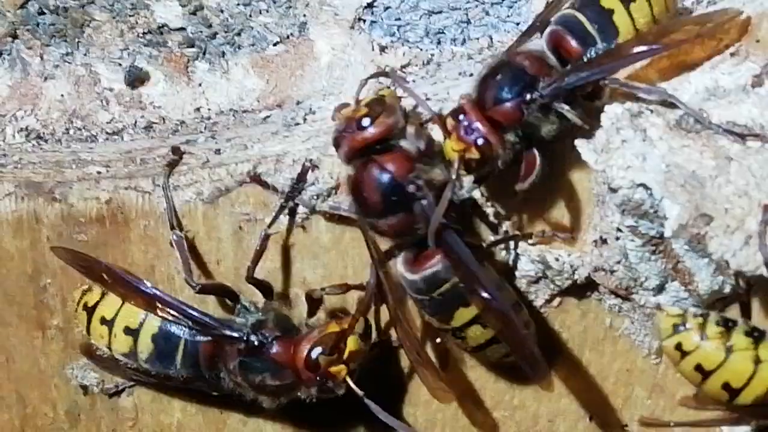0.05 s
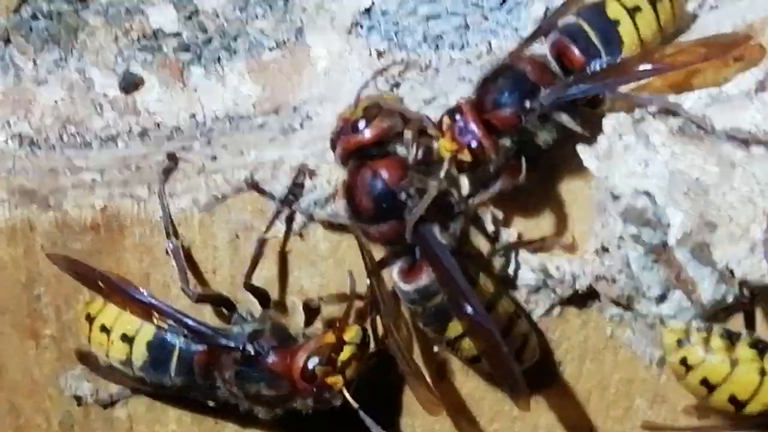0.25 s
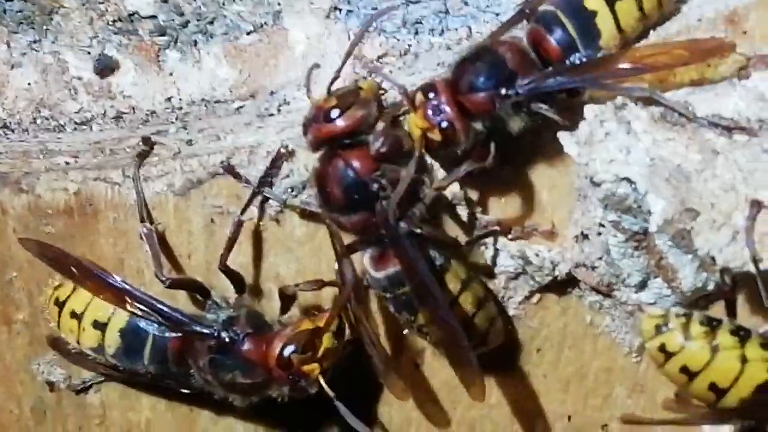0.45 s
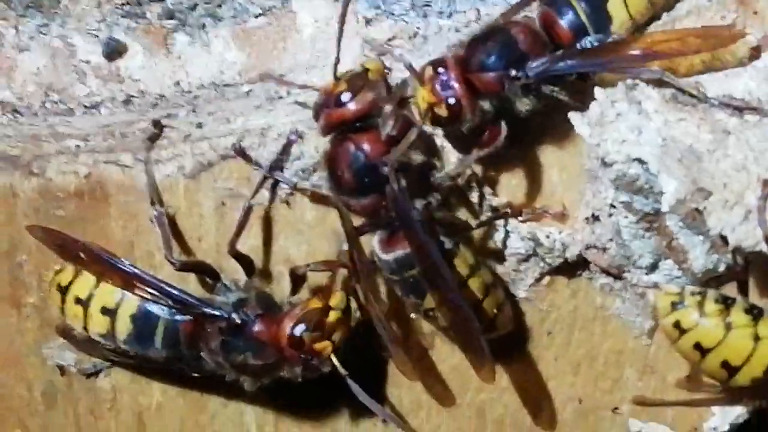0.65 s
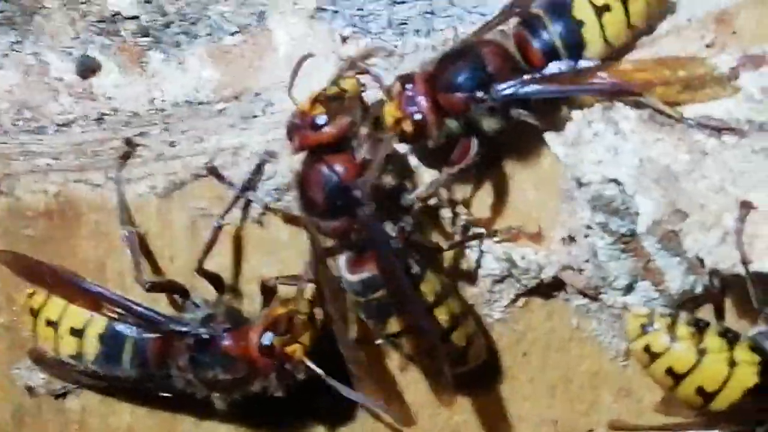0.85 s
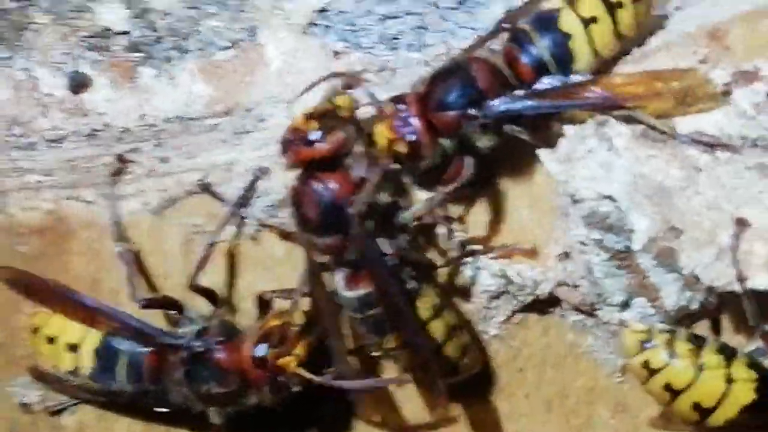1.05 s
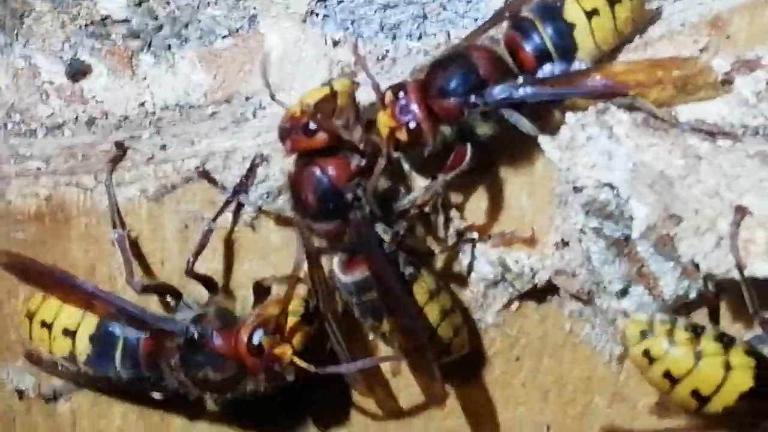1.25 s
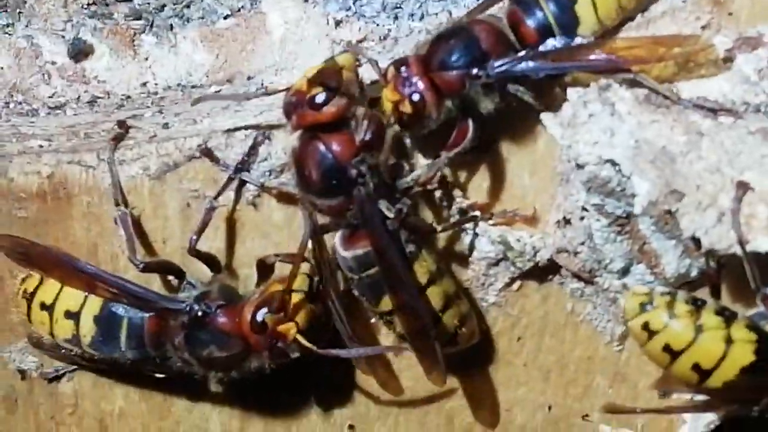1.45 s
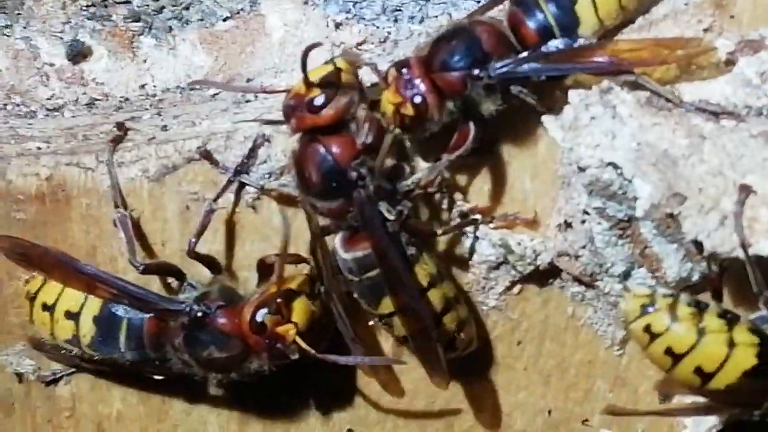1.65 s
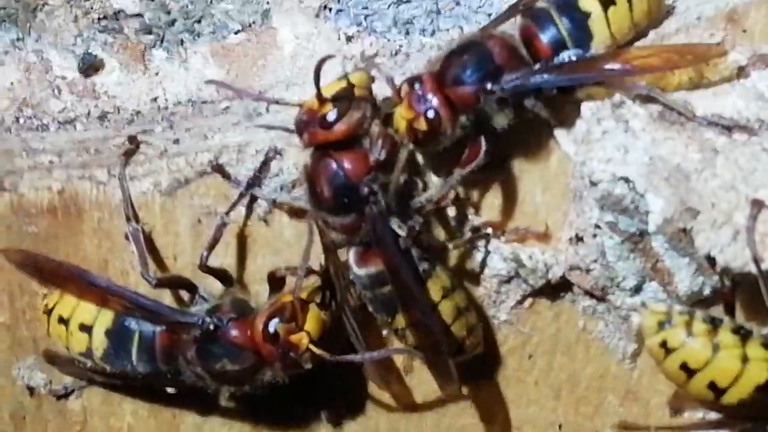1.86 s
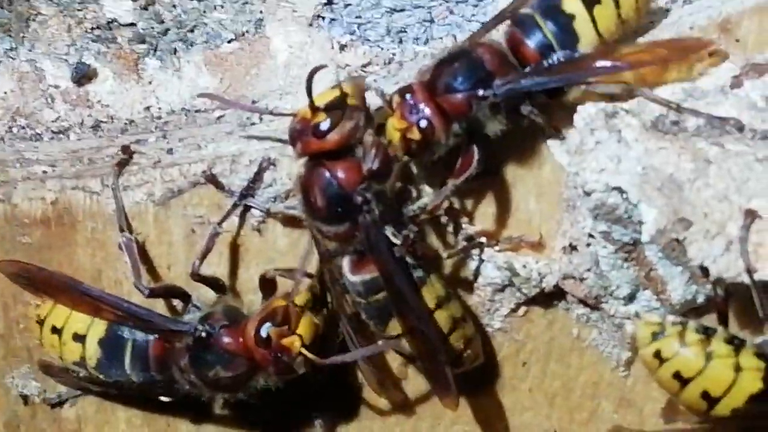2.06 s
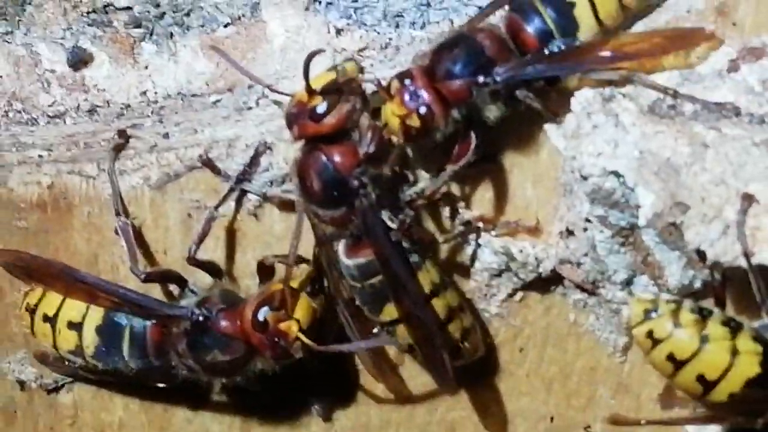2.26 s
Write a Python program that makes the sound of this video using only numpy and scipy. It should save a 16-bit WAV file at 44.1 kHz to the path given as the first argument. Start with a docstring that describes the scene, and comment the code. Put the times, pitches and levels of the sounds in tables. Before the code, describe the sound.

Two tiny dry hornet clicks over faint steady hiss in a quiet attic.

```python
"""A quiet attic, close to hornets crawling on a beam.
After 0.2 s of silence the microphone switches on with a soft pop as its bias jumps and drains.
It then hisses over house rumble, faint air and a wavering low hum, probably wings inside the nest.
At 1.3 s and 2.1 s two tiny dry ticks, likely jaws or claws, sound beside the right port;
each knocks the wood softly and scatters off beam and roof."""
import sys
import numpy as np
from scipy import signal
from scipy.fft import rfft, irfft
from scipy.io import wavfile
from scipy.ndimage import uniform_filter1d

SR = 44100
rng = np.random.default_rng(int(sys.argv[2]) if len(sys.argv) > 2 else 0)


def unload_audio(sound):
    """Save the sound as a 16-bit wav file, at the path given as the first command line argument."""
    columns = np.transpose(np.atleast_2d(sound))
    # keep every value between -1 and 1, then stretch to whole-number steps
    steps = np.round(np.clip(columns, -1, 1) * 32767)
    wavfile.write(sys.argv[1], SR, steps.astype(np.int16))


N = 105840

# background gain while the microphone settles (time [s], gain [dB])
SETTLING = [(.2, 1.5), (.28, 3), (.38, 4.5), (.47, 4), (.58, 1), (2.4, 1.5)]


def undb(db):
    return 10 ** (np.asarray(db) / 20)


def since(start_s):
    """Seconds since start_s; zero before it."""
    return np.maximum(np.arange(N) / SR - start_s, 0)


def delay(x, ms):
    """Circular delay by a linear phase shift."""
    hz = np.fft.rfftfreq(N, 1 / SR)
    return irfft(rfft(x) * np.exp(-2j * np.pi * hz * ms / 1000), N)


def gain_curve(points):
    """Linear gain along points (time [s], gain [dB])."""
    return undb(np.interp(np.arange(N) / SR, *np.array(points).T))


def noise(spectrum, rms_db):
    """Noise shaped by a spectrum (frequency [Hz], relative density [dB])."""
    hz, density_db = np.array(spectrum).T
    bins_hz = np.maximum(np.fft.rfftfreq(N, 1 / SR), 1)
    gain = undb(np.interp(np.log(bins_hz), np.log(hz), density_db))
    x = irfft(rfft(rng.standard_normal(N)) * gain, N)
    return x * undb(rms_db) / x.std()


def drift(rate_hz):
    """Smooth random drift, zero mean, unit variance."""
    hold = max(int(SR / rate_hz), 1)
    steps = np.repeat(rng.standard_normal(N // hold + 1), hold)
    x = uniform_filter1d(uniform_filter1d(steps, hold), hold)[:N]
    return (x - x.mean()) / x.std()


def ring(ms, hz, decay_ms):
    """One damped mode."""
    return np.sin(2 * np.pi * hz * ms / 1000) * np.exp(-ms / decay_ms)


def attic_air():
    """Faint air, alike at both ports."""
    # (frequency [Hz], relative density [dB])
    air_spectrum = [(400, 7), (650, -21), (850, -11.5), (1300, -1.5), (1700, 1), (2300, -9), (4000, -7.5),
                    (9000, -40)]
    return noise(air_spectrum, -85.5) * gain_curve(SETTLING)


def house_rumble():
    """Low noise of the house, strongest near 70 Hz."""
    # (frequency [Hz], relative density [dB])
    rumble_spectrum = [(20, -8.5), (40, 1.5), (72, 4), (95, 2), (130, -6.5), (170, -5), (240, -11.5),
                       (330, -15), (450, -34), (650, -37), (1200, -47.5)]
    return noise(rumble_spectrum, -71) * gain_curve(SETTLING)


def microphone_hiss(whine_hz=5321):
    """Independent hiss per port, resonant near 8 kHz, plus a thin electrical whine."""
    # (frequency [Hz], left relative density [dB], right relative density [dB])
    hiss_spectra = [(30, -1.5, 1), (244, 4.5, 3), (594, -2, -0.5), (1180, 2.5, 4.5), (2140, -1, 0),
                    (4540, 0.5, 3), (6420, -1, -0.5), (7160, -2, 4), (7900, 4, 7.5), (8940, -2, -1.5),
                    (9930, -6.5, -3.5), (10200, -5.5, -6.5), (16000, -8.5, -8.5)]
    left = noise([(hz, db) for hz, db, _ in hiss_spectra], -73)
    right = noise([(hz, db) for hz, _, db in hiss_spectra], -71)
    whine = np.sqrt(2) * undb([[-101], [-87]]) * np.sin(2 * np.pi * whine_hz * since(0))
    return np.array([left, right]) * gain_curve(SETTLING) + whine


def switch_on_pop(on_s, rise_ms=0.048, overshoot_ms=0.19, slow_lag_ms=0.56, slow_ms=0.24, drain_s=0.13):
    """The microphone's bias jumps and overshoots, takes a second, slower step, then drains away."""
    t = since(on_s)
    ms = 1000 * t
    fast = (1 - np.exp(-(ms / rise_ms) ** 2)) * (1 + np.exp(-ms / overshoot_ms))
    slow = 1 - np.exp(-np.maximum(ms - slow_lag_ms, 0) / slow_ms)
    drain = np.exp(-(t / drain_s) ** 1.32)
    fast_share = np.array([[0.8], [0.31]])  # left, right
    return -undb(-28) * (fast_share * fast + (1 - fast_share) * slow) * drain


def hum_tone(hz, level_db, waver_db, wander_hz):
    """A sine drifting in pitch and level."""
    phase = 2 * np.pi * np.cumsum(hz + wander_hz * drift(9)) / SR
    return np.sqrt(2) * undb(level_db + waver_db * drift(13.03)) * np.sin(phase)


def nest_hum():
    """Two low tones, probably wings inside the nest; the lower swells and dips."""
    # lower tone (time [s], gain [dB])
    swells = [(.25, 3.5), (.48, -7), (.64, 1), (.88, 0.5), (1.05, -2), (1.2, 4), (1.48, -16), (1.66, -3),
              (1.88, -7.5), (2.1, -1), (2.4, -1)]
    lower = hum_tone(108.5, -66.5, waver_db=1.5, wander_hz=0.8) * gain_curve(swells)
    upper = hum_tone(152, -75, waver_db=2.5, wander_hz=-0.43)
    return lower + upper


def reflections(x, delay_ms, decay_ms, left_db, right_db):
    """Dense fading reflections, different at each port."""
    ms = 1000 * since(delay_ms / 1000)[:SR // 4]
    tail = rng.standard_normal((2, len(ms))) * (ms > 0) * np.exp(-ms / decay_ms)
    tail /= np.sqrt(np.sum(tail ** 2, axis=1, keepdims=True))
    return signal.fftconvolve(x[None], tail, axes=1)[:, :N] * undb([[left_db], [right_db]])


def hornet_ticks(attack_ms=0.21, crack_lag_ms=0.15, wood_lag_ms=0.061, far_port_db=-39):
    """Each snap cracks, rings for about 1 ms, knocks the wood and scatters off beam and roof."""
    # (time [s], main mode [Hz], level [dB], decay [ms], crack re tick [dB])
    ticks = [(1.3157, 6940, -21, 0.26, -17), (2.1141, 7770, -15, 0.21, -12)]
    # further modes of a tick (frequency [Hz], level re tick [dB], decay [ms])
    side_modes = [(6300, -48, 0.21), (7600, -23.5, 0.77), (10900, -35, 0.27)]
    # wood under a tick (frequency [Hz], level [dB], decay [ms])
    wood_modes = [(206, -51, 2.9), (650, -58.5, .8), (1150, -53.5, 1.1), (1520, -51, 1.7)]
    snap, knock = np.zeros(N), np.zeros(N)
    for start_s, main_hz, tick_db, decay_ms, crack_db in ticks:
        ms = 1000 * since(start_s)
        body = ring(ms, main_hz, decay_ms)
        body += sum(undb(db) * ring(ms, hz, fade_ms) for hz, db, fade_ms in side_modes)
        attack = 1 - np.exp(-(ms / attack_ms) ** 2)
        crack = undb(crack_db) * ring(np.maximum(ms - crack_lag_ms, 0), hz=12500, decay_ms=0.034)
        snap += 2 * undb(tick_db) * (body * attack + crack)
        wood_ms = np.maximum(ms - wood_lag_ms, 0)
        knock += sum(undb(db) * ring(wood_ms, hz, fade_ms) for hz, db, fade_ms in wood_modes)
    left = delay(undb(far_port_db) * snap + knock, ms=0.36)
    beam = reflections(snap, delay_ms=0.7, decay_ms=3, left_db=-23, right_db=-11.5)
    roof = reflections(snap, delay_ms=5, decay_ms=32, left_db=-30, right_db=-26)
    return np.array([left, snap + knock]) + beam + roof


def scene():
    """Hum and rumble from the right, reaching the left port later; air; two ticks."""
    low = nest_hum() + house_rumble()
    return np.array([delay(low, ms=0.39), low]) + attic_air() + hornet_ticks()


def record(dry):
    """Silence until the microphone switches on; it adds pop and hiss and cuts the top."""
    on_s, cutoff_hz = 0.20356, 15800
    live = (dry + microphone_hiss()) * (since(on_s) > 0) + switch_on_pop(on_s)
    lowpass = signal.ellip(10, 0.2, 70, cutoff_hz, fs=SR, output="sos")
    return signal.sosfilt(lowpass, live)


dry = scene()
out = record(dry)
unload_audio(out)
```